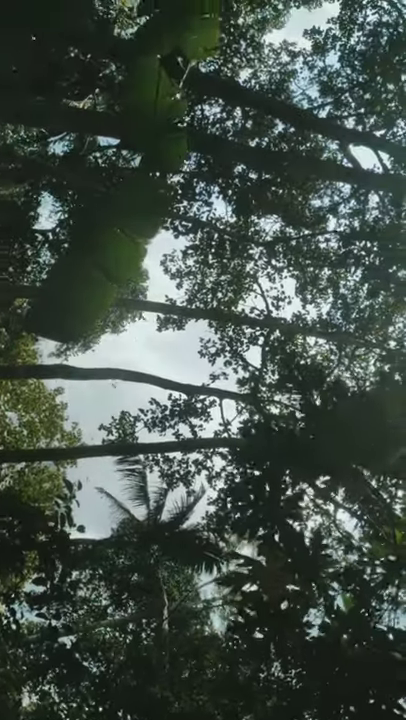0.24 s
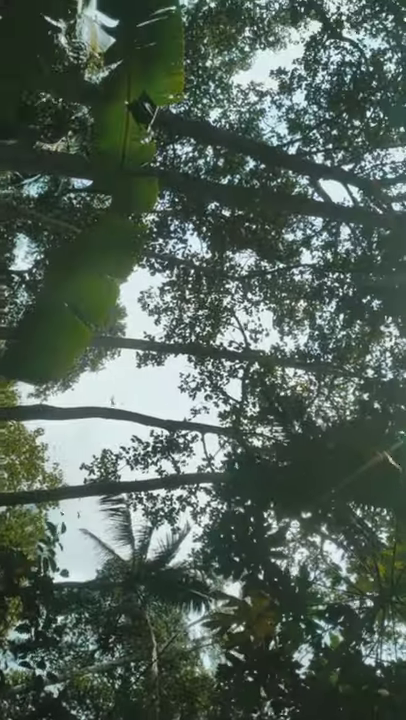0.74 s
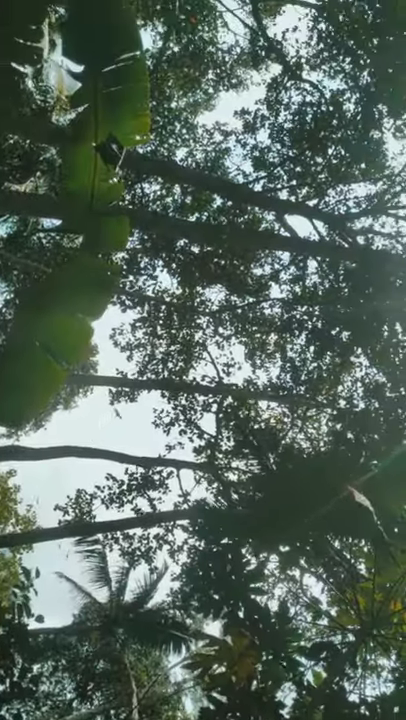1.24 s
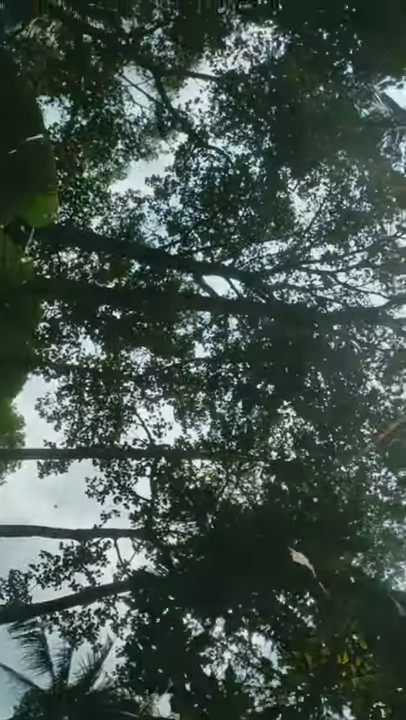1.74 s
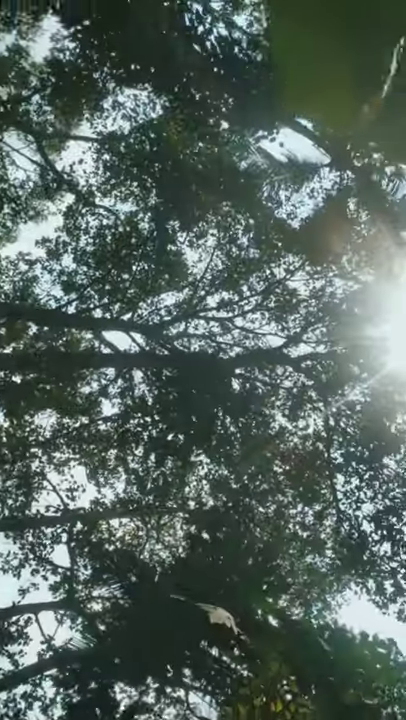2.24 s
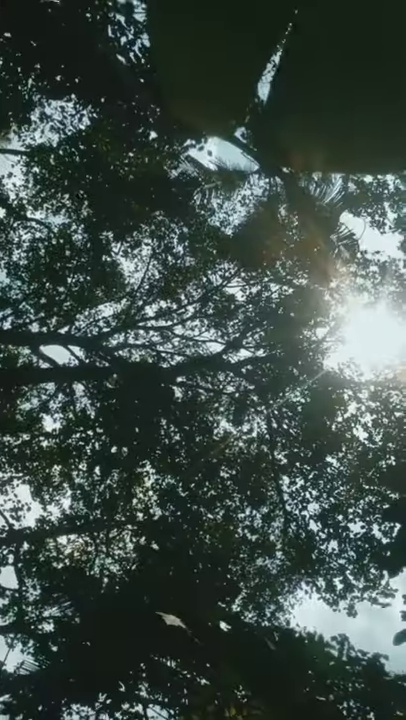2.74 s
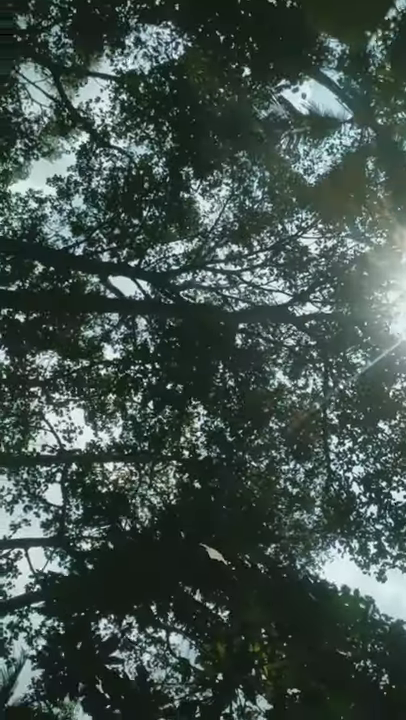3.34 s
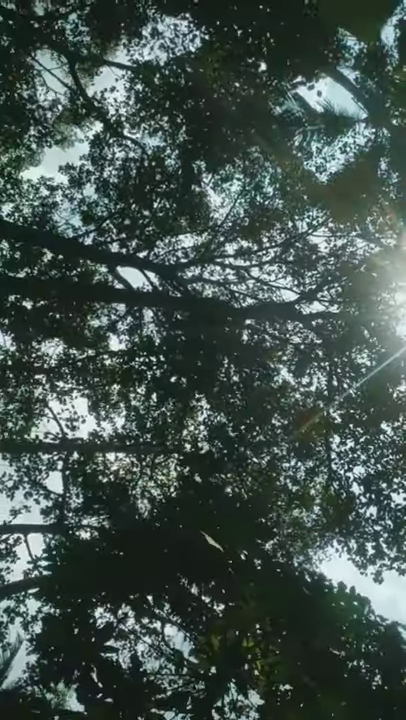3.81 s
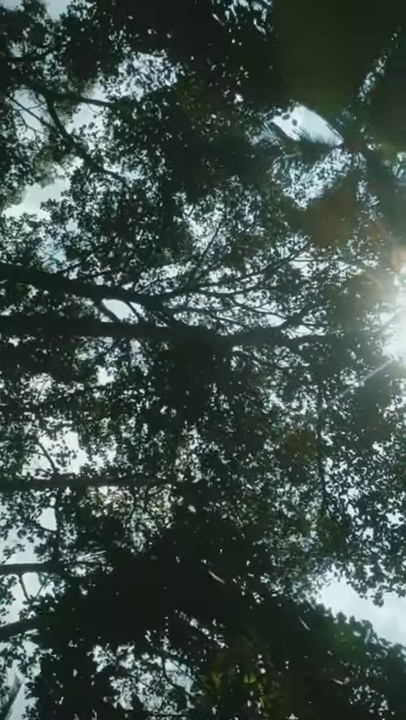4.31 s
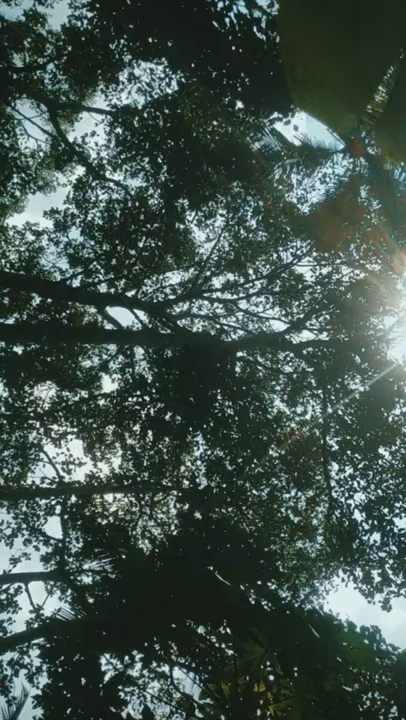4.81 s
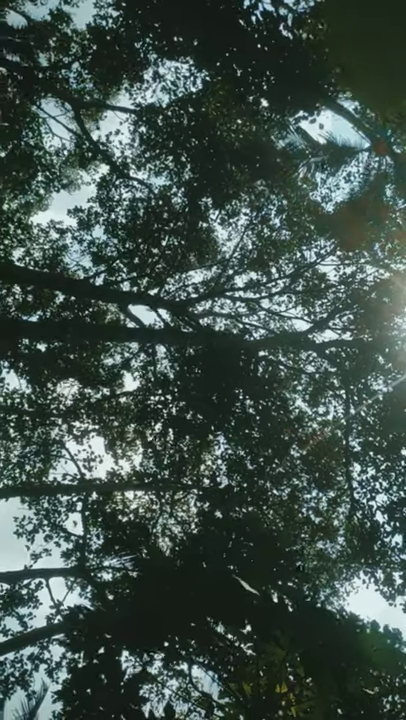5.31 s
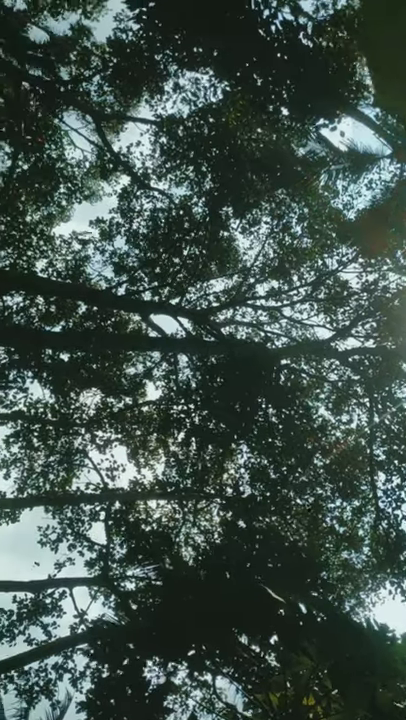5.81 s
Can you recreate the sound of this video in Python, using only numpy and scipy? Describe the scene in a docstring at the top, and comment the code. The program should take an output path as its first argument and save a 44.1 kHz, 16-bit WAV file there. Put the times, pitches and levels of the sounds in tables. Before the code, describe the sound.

Hundreds of fruit bats screech high in tall trees, a dense shrill hiss, while slow footsteps rustle and crackle in leaf litter below.

```python
"""A colony of fruit bats screeches high in tall trees; hundreds of rough calls and their echoes blend into a hiss.
Nearer screeches, shrill squeals and low squawks stand out: jittery tones and overtones from strained throats.
Below, someone walks slowly over soft leaf litter: shaped noise rustles, crackles, thuds and snaps twigs.
Faint chatter comes from farther trees, over forest rumble and a light breeze on the phone's two ports."""
import sys
import numpy as np
from scipy import signal
from scipy.fft import rfft, irfft, next_fast_len
from scipy.io import wavfile
from scipy.ndimage import uniform_filter1d

SR = 44100
rng = np.random.default_rng(int(sys.argv[2]) if len(sys.argv) > 2 else 0)


def write(x):
    x = np.atleast_2d(x).T
    wavfile.write(sys.argv[1], SR, np.round(np.clip(x, -1, 1) * 32767).astype(np.int16))


N = 266892
TOP_HZ = 15750  # the phone's upper limit

# spectrum of feet on damp leaves and of twigs: f/Hz, level/dB [dB per Hz]
RUSTLE_COLOUR = [(150, -32), (400, -1), (700, 1.5), (1100, -1.5), (2100, 8.5), (3500, 4), (6000, -5),
                 (12000, -30)]


def undb(db):
    """Decibels to gain."""
    return 10 ** (np.asarray(db) / 20)


def unit(x):
    """Scale to rms 1."""
    return x / np.sqrt(np.mean(x ** 2) + 1e-18)


def pan(db):
    """Left and right gains for a left-minus-right level difference."""
    return undb(np.array([[.5], [-.5]]) * db)


def colour(x, points):
    """Filter by (Hz, dB) points joined on a log-frequency axis."""
    hz, db = np.transpose(points)
    size = next_fast_len(N)
    bins = np.maximum(np.arange(size // 2 + 1) * SR / size, 1)
    gains = undb(np.interp(np.log(bins), np.log(hz), db))
    return irfft(rfft(x, size) * gains, size)[..., :N]


def wander(n, rate, size=4800):
    """A random line with about rate turns a second and spread 1."""
    return unit(np.interp(np.arange(n) * rate / SR, np.arange(size), rng.standard_normal(size)))


def arch(n):
    """A swell that opens and closes."""
    return np.sin(np.pi * (np.arange(n) + .5) / n)


def add(out, s, x):
    """Mix a sound in from time s."""
    start = int(s * SR)
    lo, hi = max(start, 0), min(start + x.shape[-1], N)
    if hi > lo:
        out[..., lo:hi] += x[..., lo - start:hi - start]


def port_pair(x, lag, pan_db):
    """A sound from one direction reaches the right port lag samples before the left."""
    shifted = np.interp(np.arange(len(x)) + lag, np.arange(len(x)), x, 0, 0)
    return np.array([x, unit(shifted) * np.std(x)]) * pan(pan_db)


def canopy(x, t60, wet_db):
    """Trunks and leaves scatter a sound into a tail that differs at each port."""
    t = np.arange(SR) / SR
    build_up = 1 - np.exp(-t / 0.034)
    tail = rng.standard_normal((2, SR)) * np.exp(-np.log(1000) * t / t60) * build_up
    tail /= np.sqrt(np.sum(tail ** 2, axis=1, keepdims=True))
    wet = signal.fftconvolve(x, tail, axes=1)[:, :N]
    return (x + undb(wet_db) * wet) / np.hypot(1, undb(wet_db))


def voice(pitch, rasp, throb_hz, jitter_hz=1500, throb=0.088):
    """Phase and loudness of a strained larynx: the pitch jitters and the call throbs."""
    n = len(pitch)
    phase = 2 * np.pi * np.cumsum(pitch * (1 + rasp * wander(n, jitter_hz, size=1400))) / SR
    throb_rate = throb_hz * (1 + 0.362 * wander(n, 41.26, size=64))
    beat = np.sin(2 * np.pi * np.cumsum(throb_rate) / SR)
    return phase, 1 + throb * beat


def chorus(lowest_hz, rasp, spread_db, glide, wet_db, count, order, lag_spread_s, syllable_s,
           creak=0.54, size=4):
    """Many bats at many distances in several trees, each syllable a creaking, arching stack of overtones."""
    golden = (np.sqrt(5) - 1) / 2
    roost_lag_s = 0.0002566  # the roost's sound reaches the left port this much earlier on average
    trees = np.zeros((size, 2, N))
    for turn, (when, length, height, throb, side, bend, near) in enumerate(rng.random((count, 7))):
        n = int(SR * syllable_s * (.5 + length))
        # high and low voices take turns, so that no register stays empty for long
        register = (turn * golden + .2 * height) % 1
        base_hz = lowest_hz * 3.5 ** register
        slide = (2 * bend - 1) * np.linspace(-1, 1, n)
        pitch = base_hz * (1 + glide * (arch(n) - .5 + slide))
        phase, pulsing = voice(pitch, rasp, 60 + 240 * throb, jitter_hz=1204.0, throb=creak)
        highest = min(order, int(TOP_HZ / base_hz))
        overtones = np.arange(1, highest + 1, dtype=np.float32)[:, None]
        # each throat favours other overtones
        throat = undb(1.9 * rng.standard_normal(order))[:highest].astype(np.float32)
        # the squared term staggers the overtones' phases
        partials = np.sin(overtones * phase.astype(np.float32) + overtones ** 2)
        call = unit(throat @ partials) * pulsing * np.sqrt(arch(n))
        call *= undb(spread_db * (2 * near - 1))
        lag = SR * (lag_spread_s * (1 - 2 * side) - roost_lag_s)
        start = (turn + when) / count * (N / SR + .15) - .15
        add(trees[turn % size], start, port_pair(call, lag, 8 * (side - .5)))
    out = sum(canopy(tree, t60=.4, wet_db=wet_db) for tree in trees)
    # as one bat stops another starts, so the crowd holds its level
    return out / np.sqrt(uniform_filter1d(np.mean(out ** 2, axis=0), SR // 16) + 1e-9)


def colony(far_db=-2.0, trim_db=3.0, hiss_db=-1.86, shrill_hz=8200, flurry_db=0.44, shrill_flurry_db=1.5):
    """Distinct calls over the noise wash of the far roost; the din grows louder and shriller in waves."""
    # waves of excitement: t/s, level/dB before trim_db, treble against it/dB before hiss_db
    waves = [(0.0, -33, -11.5), (0.22, -33, -7), (0.33, -36, -9), (0.441, -34, -9.5), (0.72, -33.5, -7.5),
             (0.88, -33.5, -7.5), (0.99, -32.5, -8.5), (1.3, -32.5, -7.5), (1.44, -33.5, -10),
             (1.84, -33, -8.5), (2.31, -35, -7.5), (2.44, -32.5, -7.5), (2.95, -35, -8), (3.08, -35, -3),
             (3.24, -33, -9.5), (3.83, -32.5, -8.5), (3.89, -35, -7.5), (3.96, -34, -2), (4.11, -31, -11.5),
             (4.36, -33.5, -7.5), (4.45, -31.5, -8.5), (5.02, -32.5, -11.5), (5.19, -35.5, -9),
             (5.36, -34.5, -13), (5.56, -35.5, -8), (5.64, -32.5, -7), (6.05, -36, -9.5)]
    # spectrum of the roost: f/Hz, level/dB [dB per Hz]
    din_colour = [(450, -49), (900, -17.5), (1250, -24), (1600, -14), (2050, -16), (2400, -7.5),
                  (2850, -2.5), (3350, -1), (4000, -1.66), (4600, -3), (5600, -1), (6600, -2.1), (8300, -8),
                  (10800, -13.5), (13000, -16), (15500, -23.5)]
    # the two ports face different ways: f/Hz, left minus right/dB
    port_tilt = [(900, -5.5), (1700, 3), (2800, 1.6), (4300, -1.5), (6300, -1.5), (7600, -1.5), (9000, 0.5),
                 (12000, -1.5), (15000, -1)]
    s, *columns = np.transpose(waves)
    loud_db, shrill_db = (np.interp(np.arange(N) / SR, s, column) for column in columns)
    calls = chorus(lowest_hz=1400.5, rasp=.014, spread_db=1.0, glide=.03, wet_db=2.5,
                   syllable_s=.024, count=1600, order=11, lag_spread_s=0.000301)
    far_roost = undb(far_db) * rng.standard_normal((2, N))
    din = colour(calls + far_roost, din_colour)
    ears = [colour(ear, [(hz, side * db / 2) for hz, db in port_tilt]) for ear, side in zip(din, (1, -1))]
    din = unit(np.array(ears))
    body = signal.sosfiltfilt(signal.butter(4, shrill_hz, fs=SR, output="sos"), din)
    # neighbours set each other off in brief flurries, the shrillest voices most of all
    flurries = undb(flurry_db * wander(N, 25))
    shrill = unit(din - body) * undb(shrill_db + hiss_db + shrill_flurry_db * wander(N, 40))
    return (body + shrill) * flurries * undb(loud_db + trim_db)


def lulls(din):
    """The din thins for a moment around one pitch: a swelling share of that band is taken away."""
    # hollows: t/s, length/s, centre f/Hz, width/Hz, depth [0-1]
    hollows = [(1.36, .8, 5650, 800, .45), (2.496, 0.32, 2800, 700, 0.5), (3.0, 0.92, 3060, 900, 0.43),
               (4.016, 0.26, 2750, 700, 0.67), (5.0, .65, 6400, 1000, .3)]
    out = din.copy()
    for s, length, hz, width_hz, share in hollows:
        dip = np.zeros(N)
        add(dip, s, share * arch(int(length * SR)))
        half = width_hz / 2
        band = [(hz - width_hz, -30), (hz - half, -3), (hz, 0), (hz + half, -3), (hz + width_hz, -30)]
        out -= dip * colour(din, band)
    return out


def screeches(gain_db=0.5, lag_s=0.000222, quaver=0.299, hoarse_db=-4.0, hoarse_spread=.13):
    """Nearer bats: a rasping partial in a wide hoarse skirt; it swells, holds, slides, quavers and chirrs."""
    # calls: t/s, length/s, pitch f/Hz, rasp and fall [shares of the pitch], level/dB before gain_db
    near_calls = [ (.0, 0.053, 3370, 0.05, .02, -41), (.04, 0.3, 2860, 0.062, 0.039, -40),
                  (.08, .07, 8500, .03, .02, -44), (.16, .1, 3600, .06, .03, -35),
                  (.38, 0.075, 7660, .04, .02, -40), (0.48, 0.21, 3530, .07, 0.028, -37),
                  (0.691, .08, 5940, 0.043, .02, -35), (.75, 0.078, 13000, .028, .03, -42),
                  (.76, .19, 5370, .07, -.03, -41), (.8, 0.053, 2920, 0.07, .03, -46),
                  (.95, 0.13, 12550, 0.04, .08, -36.5), (.97, 0.099, 10600, .046, 0.031, -38),
                  (.976, 0.096, 6600, 0.059, .02, -33), (1.08, 0.27, 3620, 0.082, -0.076, -39),
                  (1.17, .16, 12700, .035, -.03, -43), (1.22, .07, 6200, 0.035, .02, -39),
                  (1.269, 0.073, 5340, 0.05, .02, -35), (1.32, .1, 7060, .025, .02, -39.5),
                  (1.49, 0.2, 6320, 0.013, .02, -36), (1.49, 0.17, 12800, .035, 0.027, -40.5),
                  (1.67, .17, 13050, 0.02, -.02, -41), (1.7, 0.095, 6630, .025, .02, -38),
                  (1.82, 0.11, 6980, .04, .02, -41), (1.83, .11, 13700, .02, .01, -48),
                  (1.87, 0.067, 2600, .05, .03, -43), (1.95, 0.34, 6670, 0.029, 0.021, -42),
                  (2.01, 0.2, 3000, .06, -.08, -40), (2.05, .23, 12500, .03, -.02, -46),
                  (2.09, 0.1, 4530, 0.038, .02, -40), (2.42, 0.21, 6850, .05, .02, -39),
                  (2.59, 0.085, 3730, 0.1, 0.023, -32.5), (2.7, 0.21, 3980, .05, .04, -39.5),
                  (3.14, 0.3, 6990, .018, 0.02, -43), (3.281, .15, 5900, 0.077, 0.027, -37),
                  (3.47, 0.27, 4140, 0.052, -0.013, -40), (3.469, 0.34, 7900, 0.034, -.05, -45),
                  (3.68, 0.19, 5950, 0.065, 0.011, -34), (3.78, 0.076, 3860, .07, .03, -33),
                  (3.939, .13, 5800, 0.041, -.07, -37.5), (3.966, 0.062, 3950, 0.1, 0.059, -29),
                  (4.06, 0.167, 7560, 0.036, 0.02, -36.5), (4.1, .08, 8900, .03, .02, -40),
                  (4.16, .08, 3720, .07, .03, -34), (4.38, 0.13, 9060, 0.046, .02, -37),
                  (4.409, 0.071, 5400, 0.084, .02, -31), (4.48, 0.073, 3730, 0.087, 0.019, -33),
                  (4.52, 0.25, 5310, 0.077, -.08, -34.5), (4.63, .08, 8780, .035, .02, -41),
                  (4.91, 0.083, 8400, .06, .02, -34), (4.909, .07, 4770, 0.14, .03, -30),
                  (5.01, 0.067, 3600, 0.04, .03, -38), (5.18, 0.13, 2534, 0.053, .06, -42),
                  (5.22, 0.076, 5430, .04, .02, -37.5), (5.23, .2, 8150, .04, -.02, -43),
                  (5.339, 0.092, 3140, 0.077, .03, -35.5), (5.482, 0.138, 10270, 0.05, .02, -39),
                  (5.66, 0.17, 9750, 0.06, .02, -42), (5.75, 0.11, 8100, 0.063, -.04, -37),
                  (5.8, 0.093, 3100, 0.083, .03, -34), (5.98, .08, 3150, .06, .02, -35.5), ]
    attack_s, release_s = 0.018, 0.03
    out = np.zeros((2, N))
    for s, length, hz, rasp, fall, db in near_calls:
        n = int(length * SR)
        t = np.arange(n) / SR
        slide = 1 + fall * np.linspace(.5, -.5, n)
        pitch = hz * slide * (1 + quaver * rasp * wander(n, 45.16))
        phase, chirr = voice(pitch, rasp, throb_hz=111.0, jitter_hz=2139, throb=0.19)
        skirt = undb(hoarse_db) * wander(n, 2 * hoarse_spread * hz) * np.cos(phase)
        held = np.minimum(1, np.minimum(t / attack_s, (length - t) / release_s))
        syllables = unit(undb(1.2 * wander(n, 37.0)))
        call = (np.sin(phase) + skirt) * held * chirr * syllables * undb(db + gain_db)
        # every call reaches the left port first, by a varying lead
        add(out, s, port_pair(call, -lag_s * SR * rng.uniform(0, 1.354), -0.85))
    return canopy(out, t60=0.33, wet_db=-2.0)


def squawks(pitch_hz=210, width_hz=170, lag_s=0.00039):
    """Low quarrelling squawks: hoarse calls whose overtones ring one throat resonance."""
    # calls: t/s, length/s, throat resonance f/Hz, level/dB
    low_calls = [(.04, 0.13, 1560, -52), (0.82, 0.31, 1660, -48.5), (1.512, 0.26, 1560, -47),
                 (2.185, 0.071, 1320, -47.5), (2.294, 0.14, 1320, -44.5), (2.369, 0.16, 1510, -45.5),
                 (2.543, 0.11, 1850, -50), (2.749, 0.27, 1300, -47.5), (2.804, 0.19, 1740, -45),
                 (3.278, .17, 1580, -46.5), (3.748, 0.095, 1750, -50), (4.149, 0.15, 1470, -52),
                 (4.507, 0.17, 1360, -49)]
    out = np.zeros((2, N))
    for s, length, throat_hz, db in low_calls:
        n = int(length * SR)
        pitch = pitch_hz * rng.uniform(.9, 1.1) * (.9 + .15 * arch(n))
        phase, pulsing = voice(pitch, rasp=0.1216, throb_hz=45.5)
        call = 0
        for k in range(1, 14):
            resonance = 1 / (1 + ((k * pitch - throat_hz) / width_hz) ** 2)
            call = call + np.sin(k * phase) * resonance
        call = unit(call) * pulsing * np.sqrt(arch(n)) * undb(db)
        add(out, s, port_pair(call, -lag_s * SR, 1.9))
    return canopy(out, t60=0.086, wet_db=7.5)


def patchy(x, depth_db, rate, count=10):
    """Each half octave flickers on its own, as leaves of different sizes give way."""
    out = 0
    root2 = np.sqrt(2)
    for hz in 250 * root2 ** np.arange(count):
        half_octave = [(hz / 2, -50), (hz / root2, -12), (hz, 0), (hz * root2, -12), (hz * 2, -50)]
        out = out + colour(x, half_octave) * undb(depth_db * wander(N, rate))
    return out


def footsteps(rustle_gain_db=0.4, crackle_gain_db=6.0, thud_gain_db=-2.0, scuff_gain_db=-5.0,
              scuff_width_hz=210):
    """Each foot thuds on soft ground, rustles damp leaves, crackles dry ones and scuffs with a falling note."""
    # feet: t/s at the peak, swell time/s, rustle/dB, crackle/dB, thud/dB, scuff f/Hz at the peak, scuff/dB
    # (levels before the gains above)
    steps = [ (.085, 0.011, -41, -50, -56, 900, -60), (.165, 0.0099, -41, -45, -57, 800, -58),
             (.192, 0.022, -37.5, -42, -55, 850, -54), (.437, 0.0077, -42, -43, -57, 1500, -52),
             (0.833, .011, -41.5, -43, -48, 330, -47), (1.19, .015, -57, -58, -50, 397, -51),
             (1.65, 0.023, -42, -50, -49.5, 248, -51), (2.385, 0.023, -42, -47, -48.5, 350, -50),
             (3.07, 0.032, -38.5, -44, -49.5, 600, -51), (3.18, 0.011, -52, -56, -53, 500, -63),
             (3.765, 0.0088, -48, -48, -46.5, 800, -60), (3.937, .012, -43, -48, -63, 580, -41.5),
             (3.975, 0.017, -39.5, -43, -56, 2000, -47), (3.99, 0.033, -52, -47, -42.5, 280, -45),
             (4.075, 0.015, -58, -60, -56, 600, -42.5), (4.755, 0.045, -37, -39, -44.5, 686, -49),
             (4.818, 0.014, -37, -41, -69, 900, -37.5), (4.832, 0.014, -55, -54, -60, 928, -40),
             (4.866, 0.02, -55, -56, -63, 880, -43), (4.888, 0.0084, -55, -56, -50, 700, -58),
             (5.25, 0.0096, -53, -49, -48.5, 700, -56), (5.615, 0.0068, -44, -52, -57, 800, -53),
             (5.648, 0.015, -35, -46, -48, 700, -38), (5.68, 0.013, -46, -52, -58, 600, -49),
             (5.81, 0.013, -37, -50, -59, 750, -59), ]
    # spectra of dry leaves and of soft ground: f/Hz, level/dB [dB per Hz]
    crackle_colour = [(2000, -25), (5000, -8), (8500, 8), (11000, 4), (15000, 2)]
    thud_colour = [(40, -40), (100, 4), (170, 1.5), (350, 0), (700, -2.5), (1200, -9.5), (3000, -47)]
    fall_oct_per_s = 9.0  # a scuff's note drops as the foot sinks in
    t = np.arange(N) / SR
    damp, dry_leaf, weight, scuffs = np.zeros((4, N))
    grains = rng.standard_normal((2, N))
    friction = wander(N, scuff_width_hz) + 1j * wander(N, scuff_width_hz)
    for s, swell_s, rustle_db, crackle_db, thud_db, scuff_hz, scuff_db in steps:
        near = np.abs(t - s) < 6 * swell_s
        age = t[near] - s
        # the fade is slightly slower than the rise
        press = np.exp(-np.abs(age) / (swell_s * np.where(age < 0, 1, 1.14)))
        damp[near] += press * undb(rustle_db + rustle_gain_db)
        dry_leaf[near] += press * undb(crackle_db + crackle_gain_db)
        weight[near] += press * undb(thud_db + thud_gain_db)
        phase = 2 * np.pi * np.cumsum(scuff_hz * 2 ** (-fall_oct_per_s * age)) / SR
        scuff = np.real(friction[near] * np.exp(1j * phase))
        scuffs[near] += scuff * press * undb(scuff_db + scuff_gain_db)
    rustle = unit(patchy(colour(grains, RUSTLE_COLOUR), depth_db=2.5, rate=77)) * damp
    crackle = unit(colour(grains, crackle_colour)) * dry_leaf
    # a part shared by both ports and a weaker one of each port's own
    ground = rng.standard_normal(N) + 0.23 * rng.standard_normal((2, N))
    thud = unit(colour(ground, thud_colour)) * weight
    return (rustle + crackle) * pan(3.2) + thud + scuffs * pan(1)


def twigs(decay_s=0.00058):
    """A twig gives way underfoot with a short dull crack: noise that dies away at once."""
    # snaps: t/s, level at the onset/dB
    cracks = [(0.081, -37), (.435, -31), (3.087, -31), (4.008, -31), (4.816, -28)]
    t = np.arange(SR // 100) / SR
    snaps = np.zeros(N)
    for s, db in cracks:
        add(snaps, s, np.exp(-t / decay_s) * undb(db))
    return unit(colour(rng.standard_normal((2, N)), RUSTLE_COLOUR)) * snaps * pan(4.6)


def chatter(gain_db=4):
    """Faint hoarse bickering from farther trees: a lower, sparser chorus with fewer overtones."""
    # how hard the far bats bicker: t/s, level/dB before gain_db
    bickering = [(0.0, -50.5), (0.55, -59), (1.0, -55.5), (1.4, -56.5), (1.7, -52.5), (2.1, -55.5),
                 (2.4, -52), (2.8, -52.5), (3.1, -52), (3.5, -51), (3.75, -55), (4.05, -49.5),
                 (4.45, -50.5), (4.72, -44), (5.1, -51.5), (6.05, -51)]
    # spectrum of the far trees: f/Hz, level/dB [dB per Hz]
    chatter_colour = [(250, -13), (550, -11), (800, -10), (1200, -5), (1600, -6), (2300, -2.5), (3200, -11),
                      (5000, -22)]
    calls = chorus(lowest_hz=479.6, rasp=0.0646, spread_db=8.0, glide=0.1454, wet_db=-5.0,
                   syllable_s=.06, count=260, order=5, lag_spread_s=0.00021)
    level_db = gain_db + np.interp(np.arange(N) / SR, *np.transpose(bickering))
    return unit(colour(calls, chatter_colour)) * undb(level_db) * pan(1.5)


def air(apart=0.41, rumble_db=-55, restless_db=1.6):
    """Low rumble of distant forest air, much alike at both ports, and small puffs of breeze."""
    # spectra of the forest air and of the breeze on the ports: f/Hz, level/dB [dB per Hz]
    air_colour = [(18, 4), (32, 2.5), (48, -0.5), (65, 3), (90, -3), (125, -6.5), (160, -5.5), (220, -8.5),
                  (320, -7), (520, -8), (900, -15), (1500, -16), (3000, -41)]
    puff_colour = [(20, 4), (45, 8), (85, -2.5), (150, -12), (400, -49)]
    # breeze on the ports: t/s at the middle, length/s, level/dB, left minus right/dB
    puffs = [(0.008, 0.09, -54.5, 19), (0.248, 0.066, -56, 7), (0.434, 0.19, -55.5, 13), (.71, .1, -56, 15),
             (1.01, 0.28, -57.5, 22), (1.267, 0.13, -57, 11), (1.503, 0.04, -48, -5), (1.623, .09, -58, 8),
             (1.948, 0.13, -55, 5), (4.075, 0.031, -47, 18), (5.43, .14, -53, 6)]
    rumble = unit(colour(rng.standard_normal(N) + apart * rng.standard_normal((2, N)), air_colour))
    gusts = np.zeros((2, N))
    for s, length, db, pan_db in puffs:
        add(gusts, s - length / 2, arch(int(length * SR)) * undb(db) * pan(pan_db))
    # each port is buffeted on its own
    buffet = unit(colour(rng.standard_normal((2, N)), puff_colour))
    return rumble * undb(rumble_db + restless_db * wander(N, 26)) + gusts * buffet


def scene():
    """Bats above, feet and breeze below."""
    bats = lulls(colony()) + screeches() + squawks() + chatter()
    return bats + footsteps() + twigs() + air()


def record(dry):
    """The phone cuts the top with a steep low-pass."""
    return signal.sosfilt(signal.ellip(12, .2, 85, TOP_HZ, fs=SR, output="sos"), dry)


dry = scene()
out = record(dry)
write(out)
```